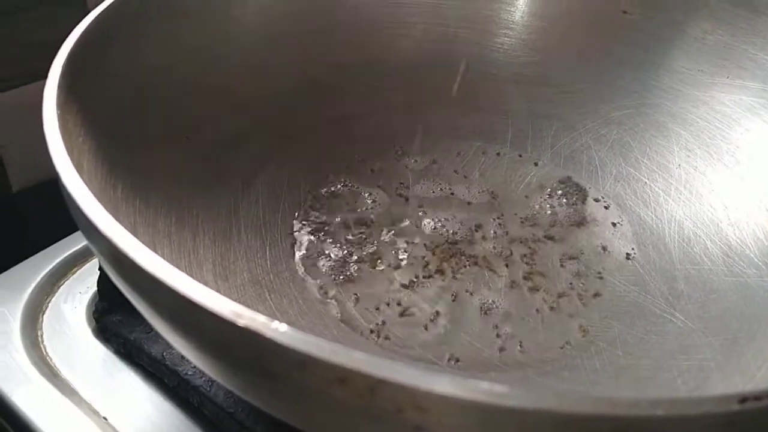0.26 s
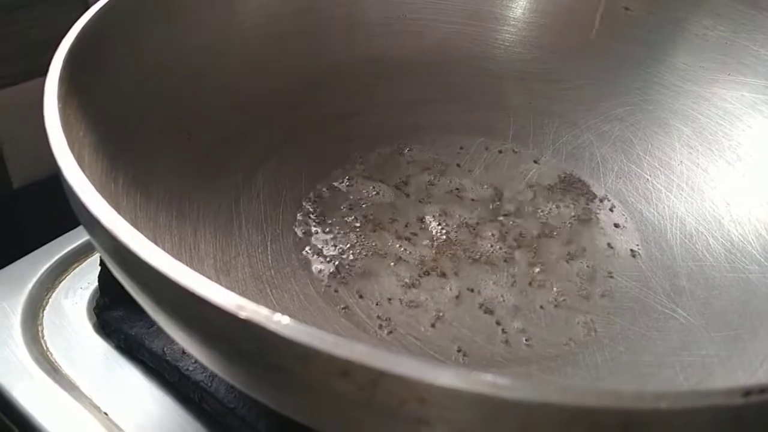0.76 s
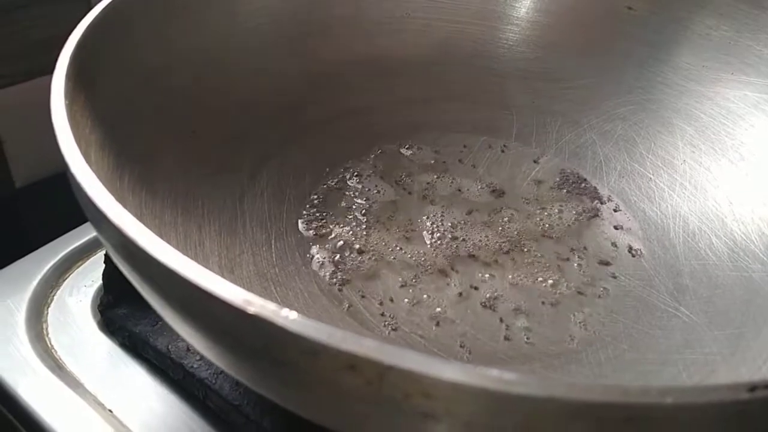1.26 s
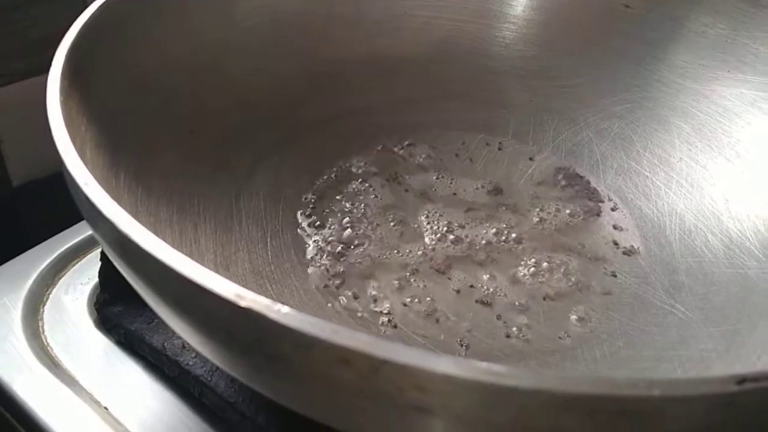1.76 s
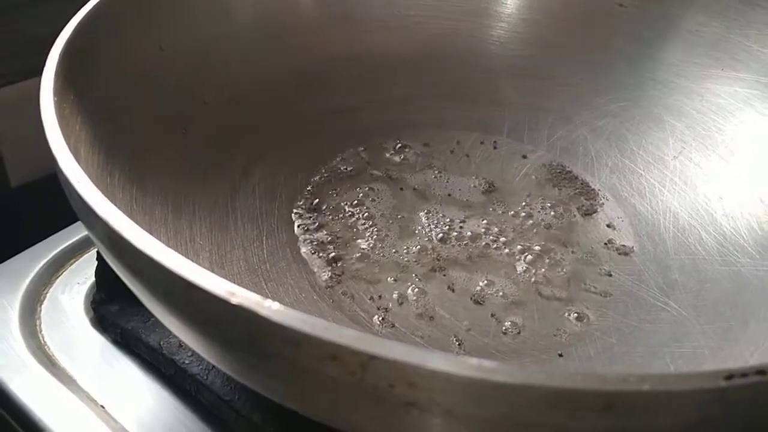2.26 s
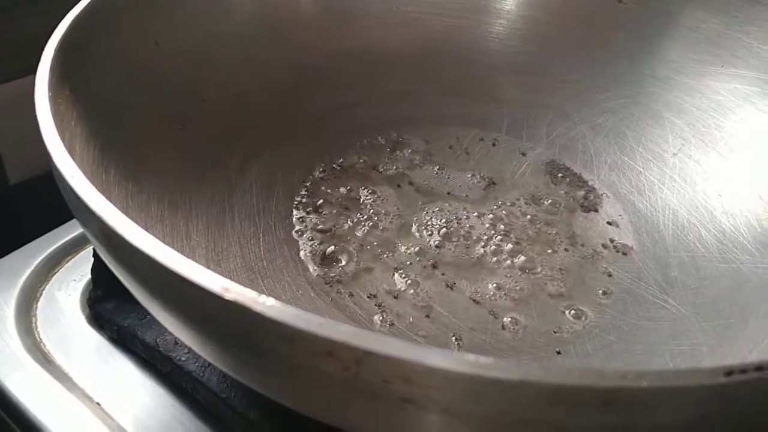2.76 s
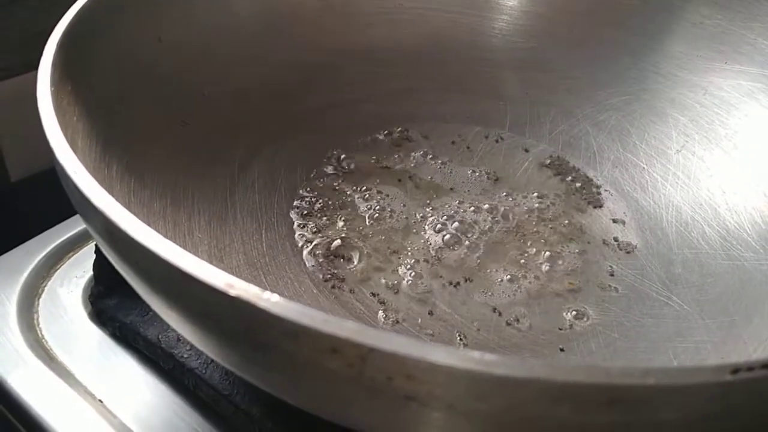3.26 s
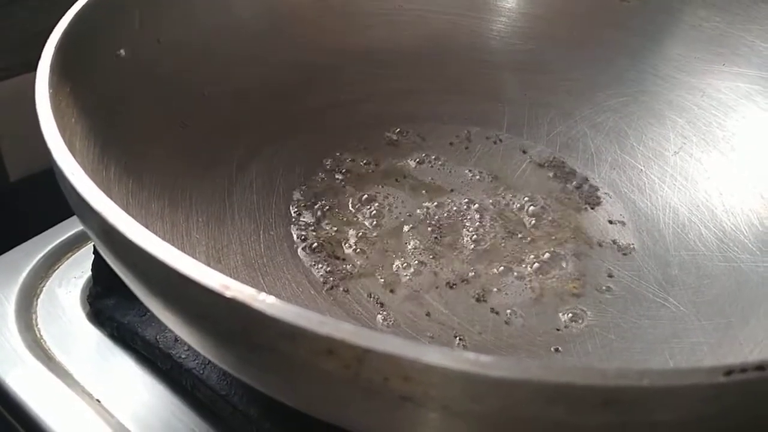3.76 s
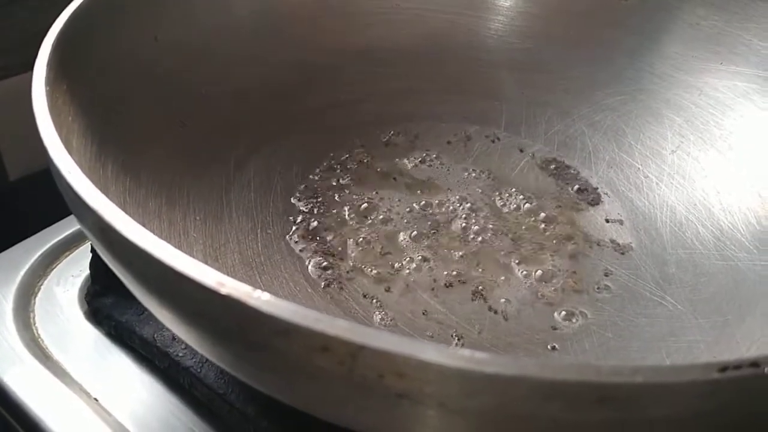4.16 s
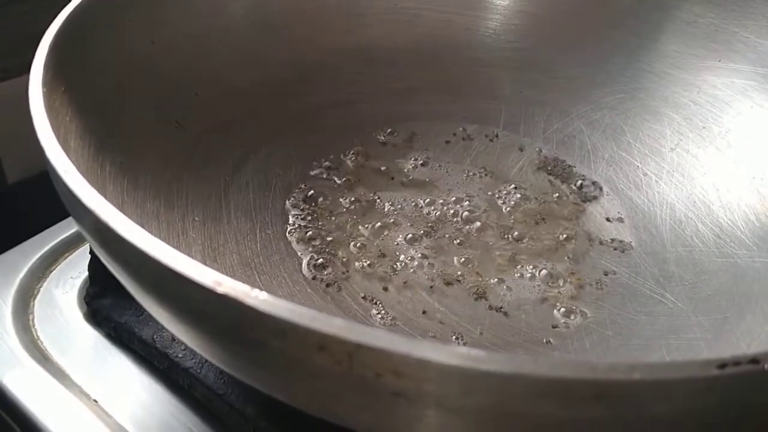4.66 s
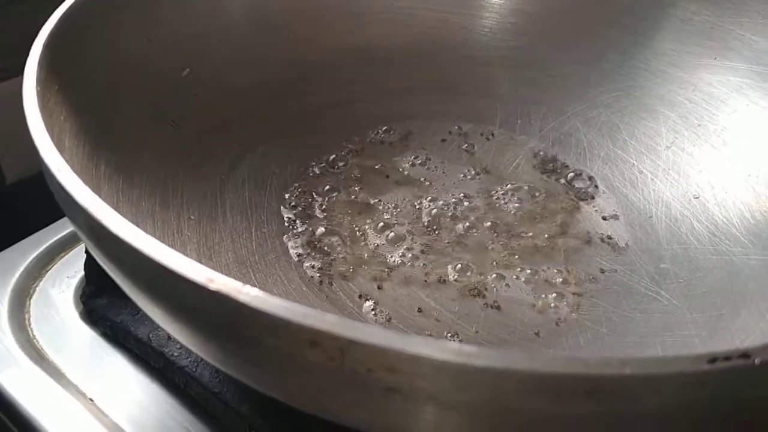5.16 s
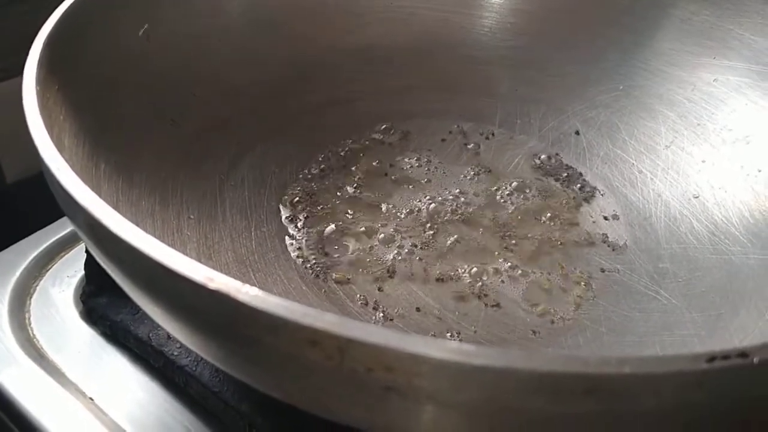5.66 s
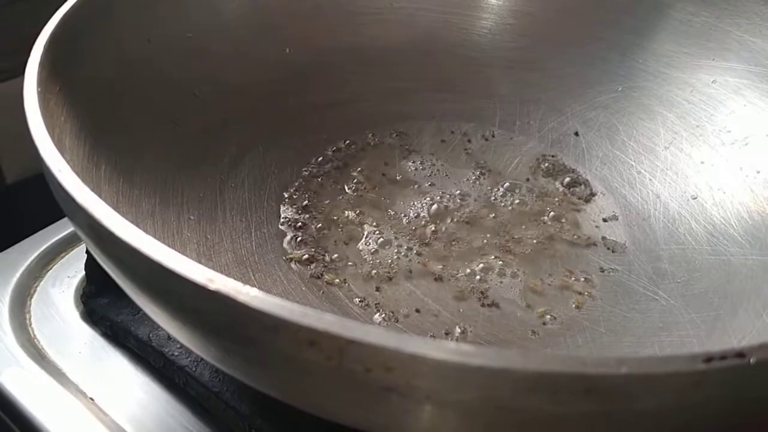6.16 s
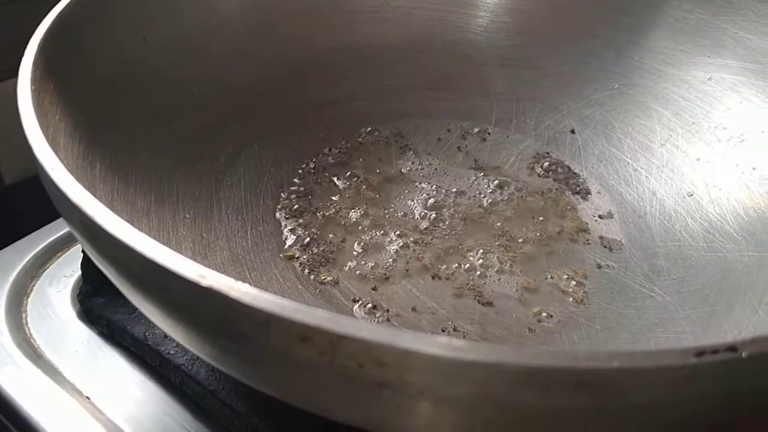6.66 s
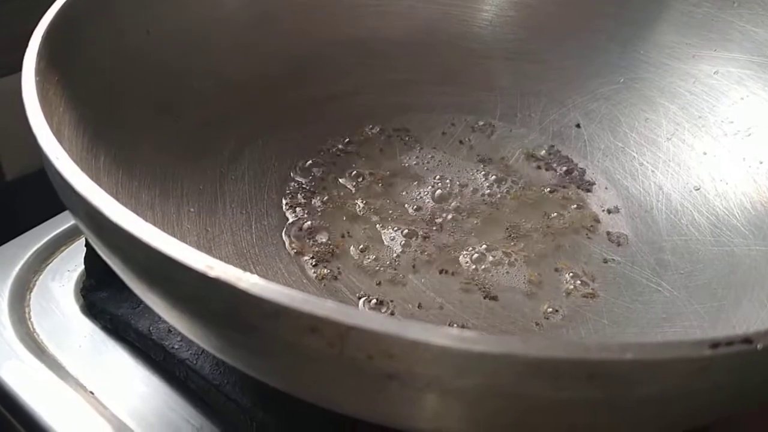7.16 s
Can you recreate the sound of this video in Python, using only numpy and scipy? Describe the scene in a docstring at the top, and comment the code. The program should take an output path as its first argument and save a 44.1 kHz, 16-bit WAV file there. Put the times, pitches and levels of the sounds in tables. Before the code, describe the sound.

Seeds popping in hot oil in a steel pan, sparse sharp snaps growing into rapid crackling over fine sizzle and a faint gas flame hiss.

```python
"""Kitchen: seeds pop in hot oil in a steel wok over a hissing gas burner, ever more often, close to a mono microphone.
Each hull bursts within milliseconds as short noise through resonances and bands; bowl and kitchen echo it.
A sharper pop knocks the pan harder and puts more above hearing, where it can trip the recorder's limiter.
Oil and flame are coloured noise, bubbling oil squeaks as decaying sines; further off, filtered noise rasps and clunks."""
import sys
import numpy as np
from scipy import signal
from scipy.fft import rfft, irfft, next_fast_len
from scipy.io import wavfile
from scipy.ndimage import uniform_filter1d, minimum_filter1d, map_coordinates

SR = 44100
rng = np.random.default_rng(int(sys.argv[2]) if len(sys.argv) > 2 else 0)


def generate_wav(sig):
    """Save sig (samples, or channels by samples) to the path in sys.argv[1] as 16-bit PCM at SR."""
    pcm = np.round(np.clip(np.atleast_2d(sig).T, -1, 1) * 32767).astype(np.int16)
    wavfile.write(sys.argv[1], SR, pcm)


N = 326496

# room rumble colour: freq_hz, density_db_per_hz
RUMBLE_SPECTRUM = [(15, -1), (30, -13.5), (42, 6), (54, -16), (70, -9.5), (81, -1.5), (100, -40),
                   (200, -18), (600, -91)]
# room rumble level before its trim: time_s, level_db
RUMBLE_LEVEL = [(0, -66.5), (.95, -69.5), (1.2, -61), (1.65, -64), (1.85, -67.5), (7.4, -66.5)]
# gas flame colour: freq_hz, density_db_per_hz
FLAME_SPECTRUM = [(60, 7), (130, 3.5), (300, 0), (500, -10.5), (1100, -9), (2400, 5), (3000, -33),
                  (6000, -54)]
# burner resonances: centre_hz, width_hz, level_db
BURNER_MODES = [(760, 160, -15), (1380, 210, 0), (1970, 300, -4), (2370, 230, -5), (3130, 300, -18)]
# rasping swells: start_s, level_db, rise_s
RASP_SWELLS = [(1.799, -48.5, 0.086), (1.92, -48.5, 0.052), (2.17, -48.5, 0.064)]
# body the rasps sound through: centre_hz, width_hz, level_db
RASP_MODES = [(2170, 400, 2), (3230, 1300, -6.5), (4150, 580, -4.5)]
# hollow clunks: start_s, level_db, t60_s, lowest_mode_hz
CLUNK_HITS = [(3.113, -53.5, 1.14, 890), (3.41, -44, 0.34, 950), (5.43, -60.5, 3.4, 780),
              (5.81, -50, 1.33, 827)]
# hollow body, rescaled in pitch per clunk: centre_hz, width_hz, level_db
HOLLOW_MODES = [(840, 180, 9), (1380, 200, 1.5), (1615, 190, 7), (2640, 430, -4)]
# fizzing oil colour: freq_hz, density_db_per_hz
FIZZ_SPECTRUM = [(1500, -11), (3500, -10), (4600, -7.5), (5300, -10), (7700, -1.5), (8400, 2), (9200, -3.5),
                 (11400, -7), (13800, -3.5), (15400, 1), (17000, -19)]
# oil fizz level: time_s, level_db
FIZZ_LEVEL = [(0, -59), (.8, -59), (1.3, -56), (3, -54.5), (4.5, -55.5), (6, -53.5), (7.4, -57)]
# brief high squeaks of bubbling oil: start_s, level_db
SQUEAKS = [(.145, -47), (.159, -47), (0.183, -44.5), (.205, -50), (0.319, -50), (.382, -43), (0.401, -42.5)]
# squeak partials, mean relative levels: pitch_hz, level_db, t60_s
SQUEAK_MODES = [(8460, -19, 0.19), (9150, -15, 0.13), (10040, -2.5, 0.14), (11000, -11, 0.19),
                (12300, -11, 0.16), (13900, -5, .14), (14540, -2, .1), (15400, -1, 0.15)]
# kitchen reverberation: freq_hz, t60_s
KITCHEN_T60 = [(300, 1), (3000, 0.7), (8000, 0.69), (16000, 0.42)]
# pan knocked by a pop: centre_hz, width_hz, level_db
PAN_MODES = [(280, 1800, -14.5), (717, 410, 0), (1640, 470, 3), (2270, 365, 4)]
# escaping steam's band: low_hz, high_hz
SNAP_BAND_HZ = (11500, 17500)
# echo of the hull ring, low rings stay dry: pitch_hz, echo_db
RING_ECHO_DB = [(1000, -14.5), (3300, 1.5), (8000, -1.5)]
# loudest pops: start_s, crack_db, pitch_hz, sharpness_db (steam snap over crack)
LOUD_POPS = [ (0.0446, -42, 3940, -19.5), (.5242, -27.5, 7840, -1.5), (0.6697, -39.5, 8900, 26.5),
             (0.9497, -39, 1100, 11), (1.7478, -26.5, 8800, 18.5), (1.879, -34, 8900, 22),
             (2.3881, -41.5, 1470, 16), (3.2953, -24, 1730, 3.5), (3.334, -32.5, 8600, 19),
             (3.556, -37.5, 7610, 4), (3.6416, -37, 7940, -4), (3.687, -30.5, 7000, 18),
             (3.7761, -30.5, 2030, 3), (3.7878, -27.5, 8300, 13), (3.963, -32.5, 9200, 4),
             (3.9975, -36, 8500, -5), (4.0049, -31, 9270, 11), (4.187, -34.5, 3200, -29),
             (4.5753, -34.5, 7900, 21.5), (4.7001, -39.5, 8300, 28.5), (4.7635, -27, 8300, 4),
             (4.9952, -32.5, 9400, 18.5), (5.0655, -43, 8750, 24.5), (5.1424, -29, 7600, -17),
             (5.3631, -36, 8450, -9), (5.3923, -23, 8270, -2), (5.4839, -37, 6600, -11),
             (5.5224, -36.5, 10100, 12), (5.7289, -21, 750, 14.5), (5.8667, -34.5, 4770, -15),
             (5.995, -39.5, 2880, -13), (6.0883, -29.5, 8850, 24.5), (6.112, -30, 9300, 3),
             (6.1805, -42.5, 8600, 10), (6.2293, -33, 7800, 21), (6.3796, -40.5, 7400, 3.5),
             (6.5334, -36, 8150, 6.5), (6.5447, -40.5, 6700, 16), (6.615, -34.5, 8300, -7),
             (6.6923, -28.5, 4030, -5.5), (6.7355, -28.5, 9400, 22.5), (6.8642, -37, 4600, 3),
             (6.887, -34, 8400, -2), (6.9326, -39, 4270, -6), (6.9435, -33, 2370, -20),
             (6.9483, -25, 4460, -13), (6.983, -34, 6500, -3), (6.989, -29, 4450, -20),
             (7.0483, -24, 8050, -34), (7.064, -32, 8100, -26), (7.1184, -33.5, 4330, 0.5),
             (7.132, -30.5, 8500, 24.5), (7.178, -36.5, 4240, 1), (7.253, -40.5, 8840, 6.5),
             (7.3682, -24, 7700, 13.5)]

RASP_T60_S = 1
AUDIBLE_SNAP_MAX_DB = 6.5  # sharpness beyond this adds no audible snap
ULTRA_HZ, ULTRA_PEAK_DB = 20000, 20  # peak re crack plus sharpness
THUD_DB, THUD_DB_PER_SHARP_DB = -15.5, 0.35  # pan knock re crack
ECHO_DB, ECHO_DB_PER_SHARP_DB = -11, -0.016  # echo re crack; sharp pops are beamed upward
ORDINARY_CRACK_DB, ECHO_DB_PER_CRACK_DB = -33, 0.0544  # echo share rises with crack level
FAINT_COUNT = 14
FAINT_DB, FAINT_SPREAD_DB = -47, 2
FAINT_HZ, FAINT_PITCH_SPREAD = 8300, .15  # spread in log pitch
FAINT_SHARP_DB, FAINT_SHARP_SPREAD_DB = -1, 4
TOP_HZ = 16000  # recorder's band limit


def amp(db):
    """Decibels to gain."""
    return 10 ** (np.asarray(db) / 20)


def unit(x):
    """x at rms 1."""
    return x / np.sqrt(np.mean(x ** 2) + 1e-20)


def along(points, hz):
    """(Hz, value) points joined on a log axis."""
    f, v = np.transpose(points)
    return np.interp(np.log(hz + 1), np.log(f + 1), v)


def curve(rows):
    """(s, value) rows as one value per sample."""
    return np.interp(np.arange(N) / SR, *np.transpose(rows))


def wobble(rate_hz):
    """Smooth random curve, rate_hz knots a second."""
    knots = rng.standard_normal(int(N * rate_hz / SR) + 4)
    return map_coordinates(knots, [np.arange(N) * rate_hz / SR])


def add(track, start_s, sound):
    """Mix a sound into the track from start_s."""
    start = max(round(start_s * SR), 0)
    part = track[start:start + len(sound)]
    part += sound[:len(part)]


def filtered(x, response):
    """x times a response of frequency."""
    size = next_fast_len(len(x) + 4096)
    spectrum = rfft(x, size) * response(np.fft.rfftfreq(size, 1 / SR))
    return irfft(spectrum, size)[:len(x)]


def coloured(x, spectrum):
    """x with a (Hz, dB) spectrum, at rms 1."""
    return unit(filtered(x, lambda hz: amp(along(spectrum, hz))))


def resonate(x, modes):
    """x through two-pole resonances (Hz, width Hz, dB) of alternating sign."""
    def response(f):
        total = 0
        for k, (centre_hz, width_hz, db) in enumerate(modes):
            damping = 1j * f * width_hz
            total = total + (-1) ** k * amp(db) * damping / (centre_hz ** 2 - f * f + damping)
        return total
    return filtered(x, response)


def band(x, lo_hz, hi_hz):
    """Causal band-pass."""
    edges_hz = np.sort(np.clip([lo_hz, hi_hz], 20, SR / 2 - 100))
    return signal.sosfilt(signal.butter(2, edges_hz, "band", fs=SR, output="sos"), x)


def blow(x):
    """x with the energy of two milliseconds at rms 1."""
    return x * np.sqrt(2 * SR / 1000 / (np.sum(x ** 2) + 1e-20))


def burst(t60_s):
    """Pressure release: one hard spike, then noise that dies at once."""
    t = np.arange(SR // 100) / SR
    return (rng.standard_normal(len(t)) + 3 * (t == 0)) * amp(-60 * t / t60_s)


def stove(flame_db, burner_db, rumble_db):
    """The flame rushes and sounds the burner's resonances, over the room's rumble."""
    flame = amp(flame_db) * coloured(rng.standard_normal(N), FLAME_SPECTRUM)

    def humps(f):
        return sum(amp(db) / (1 + (2 * (f - hz) / width_hz) ** 2) for hz, width_hz, db in BURNER_MODES)
    flicker_db = 0.24 * wobble(42)
    burner = amp(burner_db + flicker_db) * unit(filtered(rng.standard_normal(N), humps))
    rumble = amp(curve(RUMBLE_LEVEL) + rumble_db) * coloured(rng.standard_normal(N), RUMBLE_SPECTRUM)
    return flame + burner + rumble


def rasps():
    """Soft rasps: resonant noise swells linearly, then fades exponentially."""
    out, t = np.zeros(N), np.arange(SR) / SR
    for start_s, db, rise_s in RASP_SWELLS:
        body = unit(band(resonate(rng.standard_normal(len(t)), RASP_MODES), 1240, 4700))
        swell = np.minimum(t / rise_s, 1)
        fade = amp(db - 60 * np.maximum(t - rise_s, 0) / RASP_T60_S)
        add(out, start_s, body * swell * fade)
    return out


def clunks(rise_s):
    """Distant hollow knocks: resonant noise, each at its own pitch, with a soft onset."""
    out, t = np.zeros(N), np.arange(SR) / SR
    for start_s, db, t60_s, lowest_hz in CLUNK_HITS:
        scale = lowest_hz / HOLLOW_MODES[0][0]
        modes = [(hz * scale, width_hz, level_db) for hz, width_hz, level_db in HOLLOW_MODES]
        body = unit(band(resonate(rng.standard_normal(len(t)), modes), 380, 4200))
        add(out, start_s, body * amp(db - 60 * t / t60_s) * (1 - np.exp(-t / rise_s)))
    return out


def oil(tick_rate_hz, tick_db, tick_spread_db):
    """Countless tiny steam bubbles merge to a hiss; a few bigger ones tick."""
    hiss = coloured(rng.standard_normal(N), FIZZ_SPECTRUM) * amp(0.13 * wobble(2.9))
    when, size, polarity = rng.random((int(tick_rate_hz * N / SR), 3)).T
    gains = amp(tick_db - tick_spread_db * np.log(.02 + .98 * size)) * np.sign(polarity - .5)
    impulses = np.bincount((when * N).astype(int), gains, N)
    ticks = band(signal.fftconvolve(impulses, blow(burst(t60_s=0.009)))[:N], 6000, 16000)
    return amp(curve(FIZZ_LEVEL)) * (hiss + ticks)


def squeaks(hiss_db):
    """Each squeak sounds its partials at new strengths, with a brief hiss."""
    out, t = np.zeros(N), np.arange(SR // 4) / SR
    for start_s, db in SQUEAKS:
        tone = np.zeros(len(t))
        for hz, level_db, t60_s in SQUEAK_MODES:
            decay = amp(level_db + rng.normal(0, 2) - 60 * t / t60_s)
            tone += decay * np.sin(2 * np.pi * (hz * t + rng.random()))
        hiss = unit(band(rng.standard_normal(len(t)), 7300, 14300)) * amp(hiss_db - 60 * t / 0.049)
        add(out, start_s, amp(db) * (0.56 * tone + hiss))
    return out


def surroundings(sound, bowl_t60_s, room_db, wall_s, wall_db):
    """Echo of a noise: bounces in the steel bowl, a slap from the wall, the kitchen's tail."""
    t = np.arange(len(sound)) / SR
    # time-reversed noise keeps the tail distinct from the bowl
    hz, frame_s, z = signal.stft(sound[::-1], SR, nperseg=256)
    decay = amp(-60 * frame_s / along(KITCHEN_T60, hz)[:, None])
    room = signal.istft(z * decay, SR, nperseg=256)[1][:len(t)]
    bowl = amp(-60 * t / bowl_t60_s)
    wall = amp(wall_db) * np.exp(-((t - wall_s) / 0.003) ** 2)
    onset = 1 - np.exp(-t / 0.00087)
    return ((bowl + wall) * sound + amp(room_db) * room) * onset


def faint_seeds():
    """Random rows like LOUD_POPS; their rate grows in step with time as the seeds heat up."""
    draws = rng.standard_normal((FAINT_COUNT, 3))
    progress = (np.arange(FAINT_COUNT) + rng.random(FAINT_COUNT)) / FAINT_COUNT
    starts_s = N / SR * np.sqrt(progress)
    crack_db = FAINT_DB + FAINT_SPREAD_DB * draws[:, 0]
    pitch_hz = FAINT_HZ * np.exp(FAINT_PITCH_SPREAD * draws[:, 1])
    sharp_db = FAINT_SHARP_DB + FAINT_SHARP_SPREAD_DB * draws[:, 2]
    return list(zip(starts_s, crack_db, pitch_hz, sharp_db))


def pops(snap_db, tear_echo_db, thud_echo_db, snap_echo_db, tear_db, ring_width_hz):
    """Each hull rings and tears, knocks the pan and snaps out steam; sharpness sets the balance."""
    out = np.zeros(N)
    t = np.arange(SR // 500) / SR
    ultrasound = np.blackman(len(t)) * np.cos(2 * np.pi * ULTRA_HZ * t)
    for start_s, db, hull_hz, sharp_db in LOUD_POPS + faint_seeds():
        voices = [lambda x: resonate(x, [(hull_hz, ring_width_hz, 0)]),  # hull ring
                  lambda x: band(x, 2300, 10900),  # tear
                  lambda x: resonate(x, PAN_MODES),  # pan thud
                  lambda x: band(x, *SNAP_BAND_HZ)]  # steam snap
        thud_db = THUD_DB + THUD_DB_PER_SHARP_DB * sharp_db
        audible_snap_db = snap_db + min(sharp_db, AUDIBLE_SNAP_MAX_DB)
        gains = amp(db + np.array([-1, tear_db, thud_db, audible_snap_db]))
        t60s_s = [0.0077, 0.014, 0.0035, 0.0051]
        direct = sum(g * blow(voice(burst(t60_s))) for g, voice, t60_s in zip(gains, voices, t60s_s))
        add(out, start_s, direct)
        # snap is beamed upward; crack spreads into the room
        echo_db = ECHO_DB + ECHO_DB_PER_SHARP_DB * sharp_db
        echo_db += ECHO_DB_PER_CRACK_DB * (db - ORDINARY_CRACK_DB)
        ring_echo_db = along(RING_ECHO_DB, hull_hz)
        shares = amp(echo_db + np.array([ring_echo_db, tear_echo_db, thud_echo_db, snap_echo_db]))
        spread = sum(g * unit(voice(rng.standard_normal(SR // 3))) for g, voice in zip(gains * shares, voices))
        add(out, start_s, surroundings(spread, bowl_t60_s=0.08, room_db=-7.5, wall_s=0.018, wall_db=-4.0))
        # fastest part of the burst lies above hearing
        add(out, start_s, amp(db + sharp_db + ULTRA_PEAK_DB) * ultrasound)
    return out


def scene():
    """Everything reaches one microphone."""
    gas = stove(flame_db=-65.5, burner_db=-62.0, rumble_db=3.0)
    far = rasps() + clunks(rise_s=0.011)
    sizzle = oil(tick_rate_hz=14, tick_db=-14, tick_spread_db=3.5)
    squeaking = squeaks(hiss_db=-3.5)
    seeds = pops(snap_db=-0.5, tear_echo_db=1, thud_echo_db=-5.5, snap_echo_db=-5.0,
                 tear_db=-6.0, ring_width_hz=840)
    mono = gas + far + sizzle + squeaking + seeds
    return np.array([mono, mono])


def limiter(x, hold_s, ahead_s):
    """A peak over full scale pulls the gain down just ahead of it; the gain is held, then springs back."""
    hold, ahead = int(hold_s * SR), int(ahead_s * SR)
    needed = np.pad(1 / np.maximum(np.abs(x), 1), (hold, 0), constant_values=1)
    size = hold + 2 * ahead
    held = minimum_filter1d(needed, size)[size // 2 - ahead:][:N]
    held = np.pad(held, (0, N - len(held)), mode="edge")
    return x * uniform_filter1d(held, ahead)


def record(dry):
    """The recorder limits the full-band sound, then keeps nothing above its band limit."""
    limited = limiter(dry.mean(axis=0), hold_s=0.086, ahead_s=0.0071)
    mono = filtered(limited, lambda hz: np.clip((TOP_HZ - hz) / 200 + .5, 0, 1))
    return np.array([mono, mono])


dry = scene()
out = record(dry)
generate_wav(out)
```